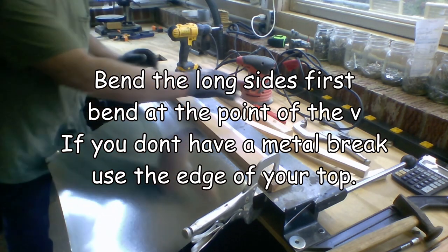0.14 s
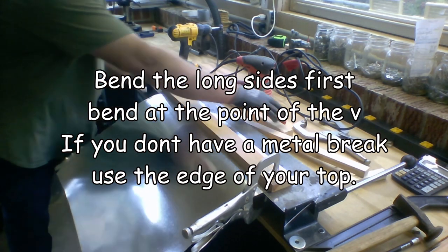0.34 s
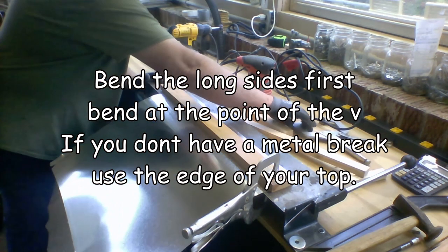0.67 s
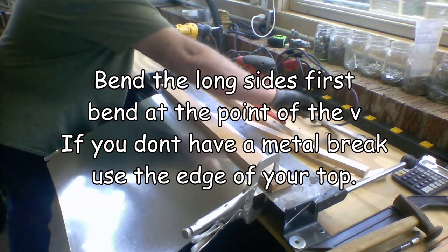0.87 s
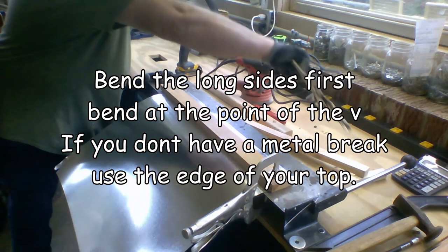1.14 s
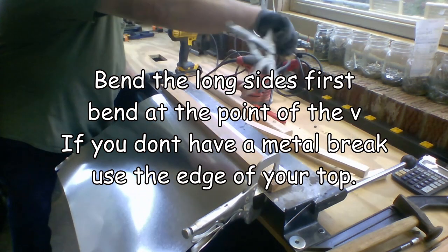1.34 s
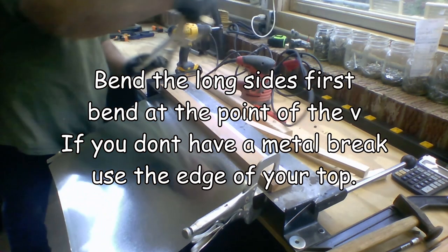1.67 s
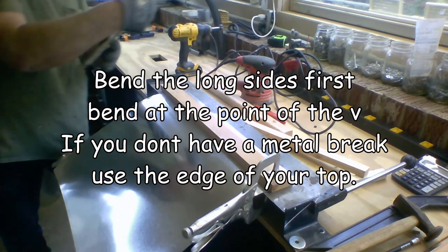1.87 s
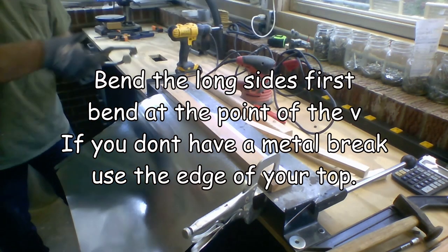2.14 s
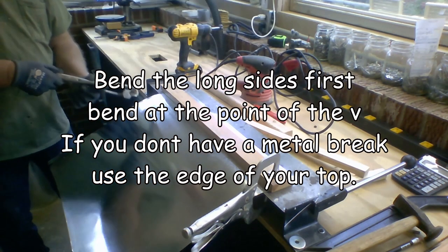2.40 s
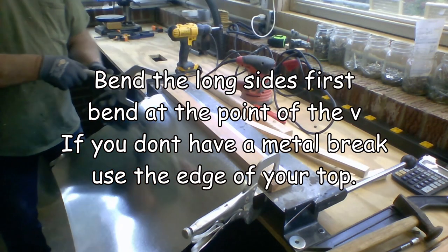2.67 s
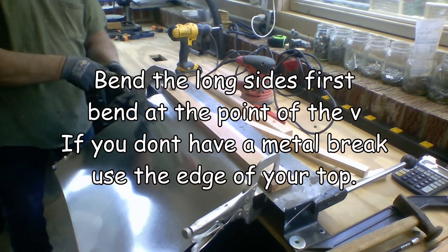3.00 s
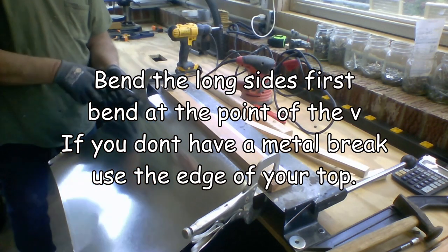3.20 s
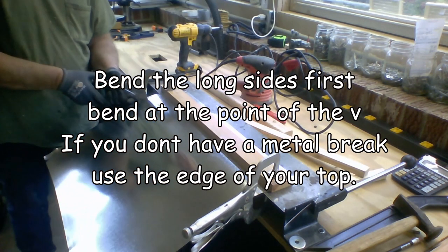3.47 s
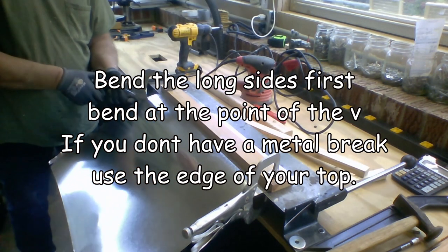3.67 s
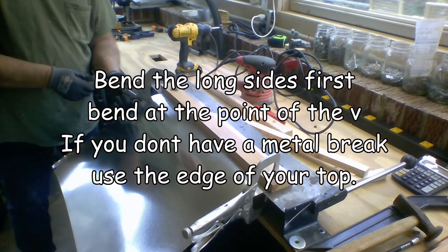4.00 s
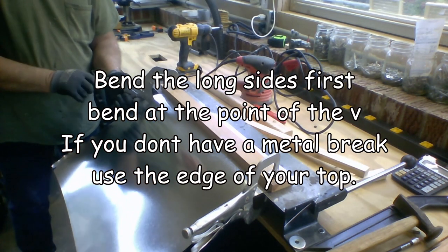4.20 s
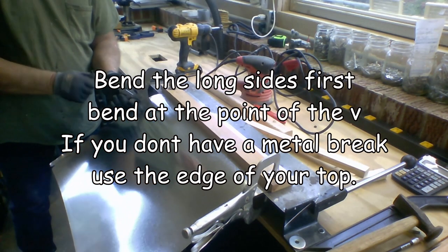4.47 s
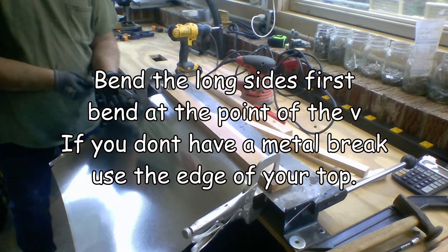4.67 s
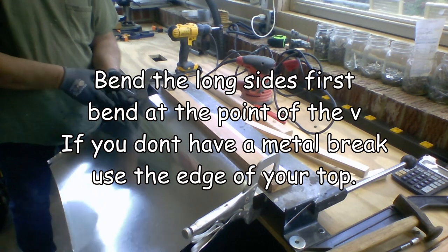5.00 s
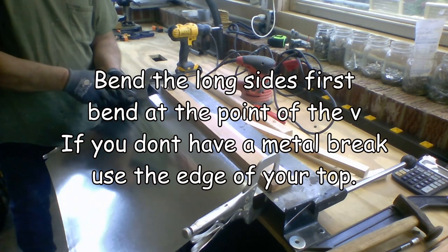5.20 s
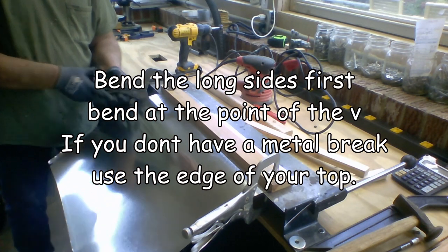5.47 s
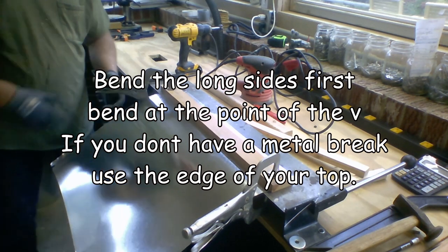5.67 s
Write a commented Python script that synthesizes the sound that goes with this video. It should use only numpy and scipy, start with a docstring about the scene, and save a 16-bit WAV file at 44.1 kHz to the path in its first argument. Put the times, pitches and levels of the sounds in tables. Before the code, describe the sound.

Thin sheet metal is handled and clamped at a bench: soft rubbing first, a bright snap, dull knocks, then loose tool clinks. Two rapid groups of sharp bangs come midway, with deep wobbling booms. After faint scrapes and nudges, a violent final clatter rings out and the sheet drags. Close, narrow-band microphone with distorted peaks; short room ring, and quiet moments swallowed by noise suppression.

```python
"""Steel locking pliers jingle and snap shut on thin sheet metal at a workshop bench. Each contact is a short
pitched snap, then damped sines and noise full of close modes that ring on in pliers, sheet, bench and shop.
The slack sheet booms, drags on the wood and scrapes; knocks, rubbed notes, light pings and a humming vise join
in over a faint hiss. A narrow microphone and a noise suppressor remove quiet sound, and the bangs are clipped."""
import sys
import numpy as np
from scipy import signal
from scipy.fft import rfft, irfft, next_fast_len
from scipy.io import wavfile
from scipy.ndimage import uniform_filter1d, map_coordinates

SR = 44100
rng = np.random.default_rng(int(sys.argv[2]) if len(sys.argv) > 2 else 0)


def natural_amplitude(level_db):
    """Convert a level in decibels to a linear amplitude factor, elementwise."""
    exponent = np.asarray(level_db, float) / 20
    return 10 ** exponent


def dump(signal):
    """Clip the signal to [-1, 1] and save it as 16-bit WAV at the path in sys.argv[1]."""
    limited = np.clip(np.atleast_2d(signal).T, -1, 1)
    pcm = np.round(limited * 32767).astype(np.int16)
    wavfile.write(sys.argv[1], SR, pcm)


N = 257984
T = np.arange(N) / SR  # time in seconds

# Tone colour of the wooden bench. Each row: frequency in Hz, relative level in dB.
BENCH = [(76, -35.5), (130, -12.5), (194, -13.5), (242, -3), (478, 0.5), (642, 0), (728, 0.5), (1600, -6.5),
         (2080, -34.5), (3520, -120)]
# Tone colour of the thin sheet. Each row: frequency in Hz, relative level in dB.
SHEET = [(650, -24.5), (1100, 0), (1680, -1), (2470, -0.5), (2670, -7.5), (2980, -3.5), (3240, -8),
         (3600, -9.5), (4680, -31), (7920, -120)]
# Tone colour of jingling steel. Each row: frequency in Hz, relative level in dB.
JINGLE = [(1880, -39.5), (3200, -7), (4090, -6), (4980, 1.5), (6280, -4), (6500, -9), (7020, -14.5),
          (7400, -49.5), (9620, -72.5), (16300, -120)]
# Clear single notes of the bench. Each row: frequency in Hz, relative level in dB, time to fall 60 dB in seconds.
BENCH_RING = [(329, -4.5, 0.12), (530, -7.5, 0.066), (578, -8.5, 0.084), (688, -3, 0.11), (837, -2, 0.052),
              (907, -9, 0.077), (1104, -5.5, 0.23), (1250, -10.5, .12)]


def unit(x):
    """Scales a sound to an rms of 1."""
    return x / np.sqrt(np.mean(x ** 2) + 1e-20)


def add(out, s, sound):
    """Mixes a sound in, starting at time s in seconds."""
    part = out[round(s * SR):][:len(sound)]
    part += sound[:len(part)]


def along(points, hz):
    """Reads a curve of (Hz, value) points on a log frequency axis."""
    f, v = np.transpose(points)
    return np.interp(np.log(hz + 1), np.log(f + 1), v)


def filtered(x, response):
    """Multiplies the spectrum of x by a response that depends on frequency."""
    m = next_fast_len(N + SR // 2)
    return irfft(rfft(x, m) * response(np.fft.rfftfreq(m, 1 / SR)), m)[:N]


def high_pass(x, corner_hz, order):
    """Keeps what lies above a corner frequency; a higher order cuts more steeply."""
    return filtered(x, lambda f: 1 / (1 + (corner_hz / (f + 1)) ** order))


def wobble(x):
    """A smooth random curve with one random knot per unit of x."""
    return map_coordinates(rng.standard_normal(int(x.max()) + 4), [x])


def standing(hz):
    """Strong modes of sheet and bench: peaks, and a few dips, in the gain in dB."""
    # Modes that stand out. Each row: frequency in Hz, width in Hz, gain in dB.
    plate_modes = [(238, 47, 6.5), (318, 65, 7), (351.6, 6.7, 4), (486.5, 6.3, 10), (552, 17, 2),
                   (716.7, 8.3, 6.5), (769, 84, 6), (909.4, 56, 5), (1110, 4.7, 4.5), (1881, 41, 7),
                   (1980, 13, -7), (2090, 30, 5), (2350, 13, -5), (2490, 28, 5), (2930, 43, 1.5),
                   (2680, 16, 8.5), (3500, 17, 9), (3847, 57, 9.5), (4150, 120, 6), (4970, 3.3, 5),
                   (5580, 15, 8.5), (5840, 10, -4.5)]
    return sum(db / (1 + (2 * (hz - c) / w) ** 2) for c, w, db in plate_modes)


def dense_modes(spectrum, depth_db):
    """Noise of rms 1, ragged with many close plate modes that shift as the metal bends."""
    z = signal.stft(rng.standard_normal(N), nperseg=4096, noverlap=3072)[2]
    # every frequency gets a random gain that changes slowly in time
    ragged = unit(uniform_filter1d(rng.standard_normal(z.shape), size=5, axis=1))
    noise = signal.istft(z * natural_amplitude(depth_db * ragged), nperseg=4096, noverlap=3072)[1][:N]
    return unit(filtered(noise, lambda hz: natural_amplitude(along(spectrum, hz) + standing(hz))))


def impulses(times, levels_db):
    """The power of each blow, placed at its moment."""
    return np.bincount((times * SR).astype(int), natural_amplitude(2 * levels_db), N)


def dying(blows, t60):
    """Power that jumps at each blow and falls 60 dB in t60 seconds."""
    return signal.lfilter([1], [1, -natural_amplitude(-120 / (t60 * SR))], blows)


def ring(modes, levels_db, length):
    """Damped sines that start together, each with its own extra level."""
    t = T[:int(length * SR)]
    return sum(natural_amplitude(db + more - 60 * t / t60) * np.sin(2 * np.pi * hz * t)
               for (hz, db, t60), more in zip(modes, levels_db))


def struck(modes, times, blows_db, spread_db):
    """Resonators that every blow kicks at a new random strength and sign."""
    out, luck = np.zeros(N), rng.standard_normal((len(times), len(modes), 2))
    for k, (hz, db, t60) in enumerate(modes):
        strength = natural_amplitude(blows_db + db + spread_db * luck[:, k, 0])
        kicks = np.bincount((times * SR).astype(int), strength * np.sign(luck[:, k, 1]), N)
        r, turn = natural_amplitude(-60 / (t60 * SR)), 2 * np.pi * hz / SR
        out += signal.lfilter([np.sin(turn)], [1, -2 * r * np.cos(turn), r * r], kicks)
    return out


def stroke(rows, rise_s, fall_s, shift_db=0):
    """Summed gain of strokes: up 40 dB, a straight run from start to end level, then down 37 dB."""
    out = np.zeros(N + SR)  # one second of room ahead for early rises
    for (s, length, start_db, end_db, _), more in zip(rows, shift_db + np.zeros(len(rows))):
        corners = np.cumsum([0, rise_s, length, fall_s])
        t = T[:int(corners[-1] * SR)]
        level_db = np.interp(t, corners, [start_db - 40, start_db, end_db, end_db - 37])
        add(out, 1 + s - rise_s, natural_amplitude(more + level_db))
    return out[SR:]


def snaps(rows):
    """Each contact starts with two short, chattering notes, one of the sheet and one of the pliers."""
    # The sheet note, then the pliers note. Each row: mean frequency in Hz, level in dB over its ring.
    snap_notes = [(2800, -2), (6000, -4)]
    scatter = 0.047  # typical random detuning, as a share of the frequency
    out, t = np.zeros(N), T[:int(.04 * SR)]
    for (s, level_db, _, *rings_db), luck in zip(rows, rng.standard_normal((len(rows), 2))):
        notes = [(hz * (1 + scatter * k), db, .016) for (hz, db), k in zip(snap_notes, luck)]
        onset = (1 - np.exp(-t / 0.00049)) ** 2
        chatter = 1 + .6 * wobble(t * 2500)
        snap = ring(notes, rings_db, .04) * onset * chatter
        add(out, s - .0004, natural_amplitude(level_db - 2.0) * snap / abs(snap).max())
    return out


def contacts():
    """Each contact is a short pitched snap, a ring of the pliers, and bench, sheet and shop answering."""
    # Steel striking sheet and bench, with rebounds. Each row: start in seconds, then relative levels in dB
    # of the snap, the bench ring, the sheet ring and the jingle ring.
    blow_rows = [(0.033, -61, -36.5, -40, -41.5), (0.123, -32.5, -34, -36.5, -43.5),
                 (0.6974, -9, -23.5, -25.5, -22.5), (0.8217, -25.5, -21, -40, -50),
                 (0.8588, -23, -48, -38.5, -33.5), (0.9295, -40, -40, -31, -52),
                 (0.985, -34, -43, -48, -32.5), (1.8121, -34.5, -26, -18, -31.5),
                 (1.8701, -28.5, -54, -35, -29.5), (1.9728, -39, -62, -34.5, -41),
                 (2.309, -27.5, -42.5, -37.5, -33.5), (2.35, -35.5, -44, -50, -39.5),
                 (2.8774, -1.5, -25, -18, -23.5), (2.9015, -7.5, -32, -28, -32.5),
                 (2.9268, -15, -48, -34.5, -35.5), (3.0304, -38, -45, -37, -40), (3.159, 0.5, -15, -9, -20),
                 (3.1726, -4, -11.5, -14, -15.5), (3.1854, -2.5, -23.5, -20, -25.5),
                 (3.2888, -19, -31, -20.5, -26.5), (3.3862, -28.5, -35, -46.5, -57.5),
                 (3.7859, -37.5, -65.5, -40.5, -42), (3.8874, -37.5, -31, -34, -45.5),
                 (3.9804, -27, -39.5, -34.5, -49), (4.0875, -37, -44, -47, -80),
                 (4.554, -35, -43.5, -73, -45), (4.8403, -9, -25.5, -20, -34.5),
                 (4.9625, -25, -43, -37.5, -40), (5.2889, 2, -15, -10, -12.5),
                 (5.3018, -13.5, -30, -24.5, -21.5), (5.3184, -6, -29, -20, -35),
                 (5.327, -10, -28, -14, -33)]
    # Loose parts of the pliers clinking in the hand. Each row: start in seconds, then relative levels in dB
    # of the snap, the jingle ring and the sheet ring.
    clink_rows = [(0.015, -63, -44.5, -69), (.382, -40, -44.5, -52.5), (1.0688, -17.5, -37.5, -57),
                  (1.229, -32, -34.5, -40), (1.292, -28.5, -40, -40), (1.3288, -25.5, -28.5, -42.5),
                  (1.483, -11, -27.5, -36.5), (1.942, -14.5, -32, -67), (1.9834, -17.5, -35.5, -44.5),
                  (2.0084, -17, -31, -45.5), (2.039, -24.5, -36, -45), (2.1276, -26.5, -37.5, -77.5),
                  (2.2828, -42.5, -43, -46.5), (2.595, -27, -41, -72), (2.608, -27.5, -45, -69.5),
                  (2.665, -36, -50.5, -94), (2.811, -45, -41, -64.5), (4.6269, -59.5, -55.5, -77),
                  (5.263, -38, -39, -58.5)]
    # Notes of the pliers. Each row: frequency in Hz, relative level in dB, time to fall 60 dB in seconds.
    plier_modes = [(2490, -8.5, 0.098), (2590, -10, 0.45), (3686, -9.5, 0.15), (3600, -11.5, 0.1),
                   (4450, -20, 0.11), (5270, -11.5, .3), (5540, -13.5, 0.074), (6280, -10.5, 0.069)]
    # Bench, sheet, its upper part, jingle, its shrill part. Each row: time to fall 60 dB in seconds
    # of the first ring, then of the shop's answer.
    ring_t60 = [(0.025, 0.71), (0.043, 0.55), (0.042, 0.45), (0.069, 0.55), (0.069, 0.37)]
    # Power of the shop's answer against the first ring, in dB, one value for each of the same five parts.
    shop_db = [-8, -9, -8.5, -8, -5]
    # clinks leave the bench silent
    rows = np.array(blow_rows + [(s, snap_db, -120, sheet_db, db) for s, snap_db, db, sheet_db in clink_rows])
    times, bench_db, sheet_db, jingle_db = rows[:, 0], rows[:, 2], rows[:, 3], rows[:, 4]
    out = snaps(rows)
    out += struck(plier_modes, times, jingle_db - 10, spread_db=5.0)
    bench = high_pass(dense_modes(BENCH, 7.2), 300, 6)  # steel is too quick to move the deep modes
    jingle = dense_modes(JINGLE, 7.9)
    shrill = high_pass(jingle, 5300, 12)
    plate = dense_modes(SHEET, 5)
    upper = high_pass(plate, 2450, 12)
    bodies = [(bench, bench_db), (plate - upper, sheet_db), (upper, sheet_db),
              (jingle - shrill, jingle_db), (shrill, jingle_db)]
    for (body, db), (first_t60, shop_t60), answer_db in zip(bodies, ring_t60, shop_db):
        blows, answer = impulses(times, db), natural_amplitude(2 * answer_db)
        power = dying(blows, first_t60) + answer * dying(blows, shop_t60)
        power -= (1 + answer) * dying(blows, 0.024)  # the ring needs a moment to build
        out += body * np.sqrt(abs(power))
    return out


def sheet_booms():
    """The slack sheet booms when it flexes: a low note that follows the bend, with deep noise around it."""
    # Booms. Each row: start in seconds, length in seconds, start level in dB, end level in dB, pitch in Hz.
    boom_rows = [(0.151, 0.068, -59, -60, 67.24), (0.339, .02, -52.5, -53, 66.7),
                 (0.598, .17, -45.5, -47, 69.4), (0.831, .1, -36.5, -40, 75.1),
                 (1.041, 0.054, -57, -58.5, 81), (1.174, .02, -67, -71, 90.7), (1.268, .02, -65, -65, 106),
                 (1.386, 0.037, -55.5, -55, 162), (1.841, .03, -54.5, -57.5, 88.6),
                 (2.281, 0.083, -71, -77, 56.18), (3.042, 0.06, -41, -36, 84.4),
                 (3.174, 0.17, -39, -48.5, 61.13), (3.397, .03, -42, -43.5, 61.3),
                 (3.547, 0.016, -51, -59, 62.6), (3.806, 0.039, -64.5, -63, 70.7),
                 (3.979, 0.035, -43, -45, 120.9), (4.126, .03, -42, -52, 119.1),
                 (4.416, 0.023, -67, -72.5, 70.87), (4.896, 0.096, -46.5, -49, 85.4),
                 (5.33, 0.19, -23, -47.5, 65.03), (5.633, 0.016, -41.5, -47, 69.6),
                 (5.77, 0.1, -62.5, -64, 58.3)]
    # Tone colour of the deep noise. Each row: frequency in Hz, relative level in dB.
    boom_spectrum = [(30, -59), (45, -20.5), (65, 2.5), (112, -4), (170, -4.5), (230, -39.5), (300, -120)]
    s, hz = np.array(boom_rows)[:, 0], np.array(boom_rows)[:, -1]
    pitch = np.interp(T, s, hz) * (1 + 0.061 * wobble(T * 25))
    note = np.sin(2 * np.pi * np.cumsum(pitch) / SR)
    gain = stroke(boom_rows, rise_s=0.067, fall_s=0.18)
    return gain * (0.65 * note + 1.08 * dense_modes(boom_spectrum, 9))


def sheet_sway():
    """Very deep noise swells as the sheet slowly sways while it is handled."""
    # Four stretches of swaying. Each row of a stretch: time in seconds, relative level in dB.
    sway_runs = [
        [(0.0, -88.5), (0.118, -63), (0.42, -72), (0.548, -58), (1.382, -56.5), (1.628, -79.5), (1.7, -101)],
        [(2.2, -74.5), (2.234, -71), (2.266, -59.5), (2.354, -56), (2.528, -73), (2.746, -84), (2.8, -100)],
        [(2.95, -75), (3.03, -54.5), (3.604, -62.5), (3.688, -51), (4.29, -85), (4.41, -68), (4.55, -86.5)],
        [(4.9, -83.5), (5.05, -61.5), (5.222, -65), (5.316, -47.5), (5.672, -68.5), (5.728, -82.5),
         (5.85, -68.5)],
    ]
    # each stretch fades in and out at its ends
    runs = [[(run[0][0] - .04, -110), *run, (run[-1][0] + 0.031, -110)] for run in sway_runs]
    level_db = np.interp(T, *np.vstack(runs).T) + 0.5
    return natural_amplitude(level_db) * dense_modes([(10, -28.5), (25, 6.0), (40, -7), (55, -20.0), (80, -120)], 0)


def rub(rows, dull_noise, bright_noise):
    """Strokes of rubbing noise; brightness raises the bright noise and lowers the dull one by as many dB."""
    brightness = np.array(rows)[:, -1]
    rise_s, fall_s = 0.043, 0.079
    dull = stroke(rows, rise_s, fall_s, -brightness)
    bright = stroke(rows, rise_s, fall_s, brightness)
    return dull * dull_noise + bright * bright_noise


def sheet_drag():
    """The sheet drags on the wood: bench noise, split into a dull and a bright part, flutters gently."""
    # Drags. Each row: start in seconds, length in seconds, start level in dB, end level in dB, brightness in dB.
    drag_rows = [(0.031, 0.078, -43, -49.5, -14.5), (0.137, .24, -35, -45.5, -5),
                 (0.425, 0.032, -47.5, -44, -8), (0.561, 0.12, -44.5, -60, -9), (0.706, 0.053, -26, -33, 0),
                 (0.796, 0.054, -27, -36, -3), (0.903, 0.32, -30, -63.5, -2.5),
                 (1.36, 0.21, -37.5, -61, -7), (1.555, 0.073, -66.5, -53, -8.5),
                 (1.684, 0.059, -49.5, -59, -15.5), (2.338, .06, -62.5, -58.5, -4.5),
                 (3.05, 0.13, -56, -48, 11.5), (3.486, 0.055, -45.5, -47.5, -6),
                 (3.588, .19, -48.5, -54.5, -6.5), (3.905, 0.13, -42.5, -47, -0.5),
                 (4.042, .12, -37.5, -47.5, 2), (4.284, 0.097, -54.5, -53.5, 9), (4.424, 0.13, -59, -55, 5),
                 (4.601, .05, -57, -56.5, 1), (4.72, 0.096, -58, -59.5, 1), (5.504, 0.24, -36, -44.5, -1.5),
                 (5.766, 0.06, -41, -48, -6)]
    wood = dense_modes(BENCH, 6.5)
    upper = high_pass(wood, 550, 6)
    return natural_amplitude(0.61 * wobble(T * 40)) * rub(drag_rows, wood - upper, upper)


def steel_scrape():
    """Steel scrapes on steel in uneven grains: sheet and jingle noise with a rough level."""
    # Scrapes. Each row: start in seconds, length in seconds, relative start level in dB, relative end level
    # in dB, brightness in dB.
    scrape_rows = [(0.033, .06, -49, -72, -1.5), (0.377, .13, -40.5, -39, 2), (0.417, 0.13, -49, -47, -7.5),
                   (0.534, .13, -41.5, -45, 1), (0.659, .03, -51, -49, -4), (0.761, .25, -37.5, -37.5, -3),
                   (1.064, .12, -59.5, -56, 10.5), (1.602, .13, -48, -40.5, 3.5),
                   (2.03, .17, -38.5, -50.5, 5.5), (2.259, .04, -38.5, -36.5, 4),
                   (2.354, .12, -39, -58.5, 3), (2.297, 0.15, -52, -56, -8.5), (3.004, .12, -38, -54, 0),
                   (3.778, .04, -54, -60, -0.5), (3.903, .08, -35.5, -45.5, -1.5),
                   (4.051, .05, -59, -55, -7.5), (4.565, .11, -42.5, -58.5, -0.5)]
    grit = natural_amplitude(-8 + 0.67 * wobble(T * 150) + 2.4 * wobble(T * 25))
    return grit * rub(scrape_rows, dense_modes(SHEET, 1.8), dense_modes(JINGLE, 3.1))


def knocks():
    """Soft blows: a low wooden note, then the bench dying away."""
    # Dull knocks on the bench. Each row: start in seconds, relative level in dB, pitch in Hz.
    knock_rows = np.array([(0.039, -34, 347), (0.148, -38.5, 310), (0.796, -24.5, 431), (0.826, -14, 456),
                           (0.928, -27, 915), (1.36, -29.5, 330), (1.565, -31, 386), (1.688, -41, 273),
                           (1.812, -22, 349), (3.027, -26, 582), (3.912, -28, 1047), (5.309, -10, 1108)])
    out, times, levels_db = np.zeros(N), knock_rows[:, 0], knock_rows[:, 1]
    onset = 1 - np.exp(-T[:int(.15 * SR)] / 0.00083)
    for s, db, hz in knock_rows:
        add(out, s - .001, ring([(hz, db, .04)], [0], .15) * onset)
    out += struck(BENCH_RING, times, levels_db - 16, spread_db=6)
    tail = np.sqrt(dying(impulses(times, levels_db), 0.75))
    return out + natural_amplitude(-15.0) * dense_modes(BENCH, 5.6) * tail


def nudges():
    """A hand shifts the sheet and rubs the bench: noise in each bench mode, strongest near the nudge's pitch."""
    # Nudges. Each row: start in seconds, length in seconds, start level in dB, end level in dB, pitch in Hz.
    nudge_rows = [(2.302, 0.093, -53.5, -55.5, 1145), (2.367, .04, -58, -58, 350),
                  (4.277, 0.058, -47.5, -52, 330), (4.305, 0.067, -49.5, -53, 858),
                  (4.324, 0.034, -50.5, -57.5, 568), (4.588, 0.053, -46, -54, 500),
                  (4.597, 0.082, -48, -57, 956), (4.706, 0.089, -46, -60, 510),
                  (4.71, 0.029, -52.5, -51, 1050), (4.805, .03, -59.5, -57.5, 1100),
                  (5.058, 0.035, -53.5, -63.5, 530)]
    reach = .3  # octaves from the pitch at which a mode is 6 dB weaker
    out, pitch = np.zeros(N), np.array(nudge_rows)[:, -1]
    for hz, _, _ in BENCH_RING:
        mode = unit(filtered(rng.standard_normal(N), lambda f: 1 / (1 + ((f - hz) / 15) ** 2)))
        weaker_db = -6 * (np.log2(hz / pitch) / reach) ** 2
        out += mode * stroke(nudge_rows, rise_s=0.028, fall_s=0.15, shift_db=weaker_db)
    return out


def pings():
    """Light touches wake one mode each: a damped sine with a soft start."""
    # Pings. Each row: start in seconds, relative level in dB, pitch in Hz, time to fall 60 dB in seconds,
    # roughness in Hz.
    ping_rows = [(0.116, -39.5, 2500, 0.16, 200), (.7, -32.5, 3560, 0.26, 75),
                 (1.789, -42.5, 3270, 0.18, 400), (2.589, -37.5, 3760, 0.054, 90),
                 (2.81, -49, 2980, 0.22, 290), (3.772, -38.5, 1950, 0.28, 1050),
                 (4.17, -60, 3860, 0.48, 18.3), (4.699, -47, 2028, .17, 47), (5.261, -42, 2100, 0.19, 210)]
    rise_cycles = 11
    out, t = np.zeros(N), T[:int(.3 * SR)]
    for s, db, hz, t60, rough_hz in ping_rows:
        chatter = 1 + 1.6 * wobble(t * rough_hz)  # a rubbing touch smears the note
        onset = 1 - np.exp(-t * hz / rise_cycles)
        add(out, s, ring([(hz, db, t60)], [0], .3) * onset * chatter)
    return out


def vise():
    """Solid steel hums on after the hardest blow, as a chord of damped sines."""
    # Notes of the vise. Each row: frequency in Hz, level in dB, time to fall 60 dB in seconds.
    vise_modes = [(1340, -40, 0.52), (2600, -41, 2.42), (3350, -50.5, 3.1), (3580, -48, 2.67),
                  (3704, -57, 1.5), (4000, -48.5, 3.15), (4300, -55, 1.1), (4950, -47.5, 0.49)]
    out = np.zeros(N)
    add(out, 5.289, ring(vise_modes, np.zeros(len(vise_modes)), .6))
    return out


def shop_hiss():
    """Faint steady noise of the shop, softer in the deep bass and the treble."""
    colour = [(30, -19), (300, -0.5), (7000, -15.5)]  # (Hz, dB)
    return natural_amplitude(-51.5) * unit(filtered(rng.standard_normal(N), lambda hz: natural_amplitude(along(colour, hz))))


def scene():
    """All sources over a faint shop hiss."""
    metal = contacts() + sheet_booms() + sheet_sway() + sheet_drag() + steel_scrape()
    return (metal + knocks() + nudges() + pings() + vise() + shop_hiss())[None]


def suppressor(x, steep, attack_s, release_s):
    """Turns down bands whose power sinks toward the opening level; opening and closing both lag."""
    # Opening level of the bands. Each row: frequency in Hz, level in dB of one frequency bin.
    gate_points = [(40, -86), (150, -70), (400, -69), (1000, -66), (1600, -67), (3000, -78), (5000, -73.5),
                   (7000, -88.5)]
    hz, t, z = signal.stft(x, SR, nperseg=1024, noverlap=768)
    power = uniform_filter1d(abs(z) ** 2, size=3, axis=0)
    lag = np.exp(-(t[1] - t[0]) / attack_s)  # faint sounds take longer to open a band
    power = signal.lfilter([1 - lag], [1, -lag], power, axis=1)
    keep = np.exp(-(t[1] - t[0]) / release_s)  # past power holds a band open a little longer
    power = np.maximum(power, signal.lfilter([1 - keep], [1, -keep], power, axis=1))
    ratio = abs(power) / natural_amplitude(2 * along(gate_points, hz))[:, None]
    gain = (ratio / (1 + ratio)) ** steep
    return signal.istft(z * np.maximum(gain, natural_amplitude(-68.5)), SR, nperseg=1024, noverlap=768)[1][:N]


def low_pass(x):
    """Removes everything above the highest recorded frequency."""
    return signal.sosfilt(signal.butter(12, 16520, fs=SR, output="sos"), x)


def record(dry):
    """Narrow microphone, noise suppressor, then hard clipping with barely rounded corners."""
    # Response of the microphone. Each row: frequency in Hz, gain in dB.
    mic_points = [(20, 5), (60, -3.5), (6300, -1), (6900, -5.5), (7400, -47), (7800, -120)]
    heard = filtered(dry[0], lambda hz: natural_amplitude(along(mic_points, hz)))
    x = suppressor(heard, steep=5.91, attack_s=0.023, release_s=0.019)
    top = .34  # clipping level
    x = x / (1 + abs(x / top) ** 20) ** (1 / 20)
    return low_pass(x[None])


dry = scene()
out = record(dry)
dump(out)
```